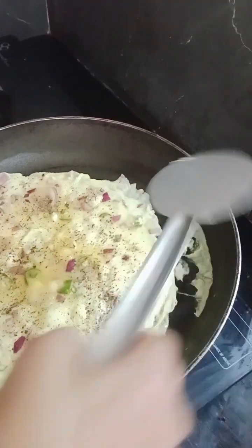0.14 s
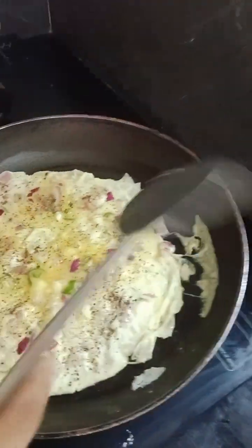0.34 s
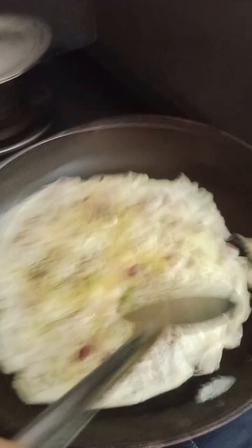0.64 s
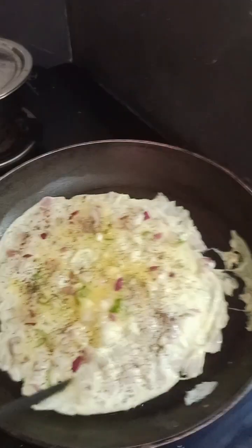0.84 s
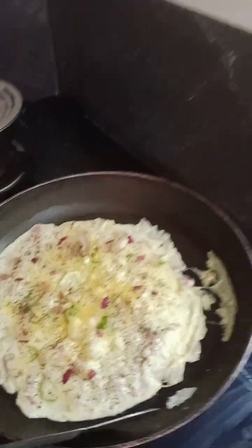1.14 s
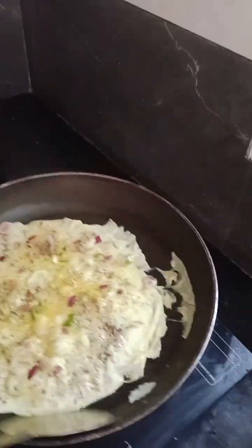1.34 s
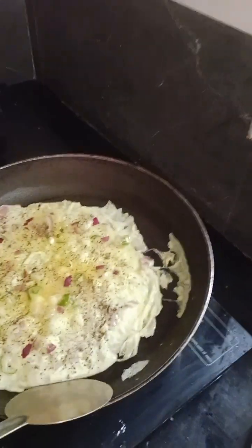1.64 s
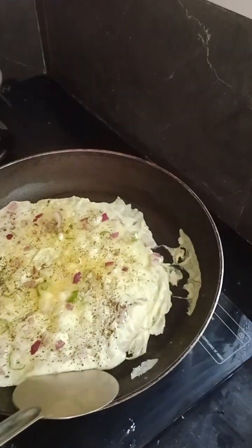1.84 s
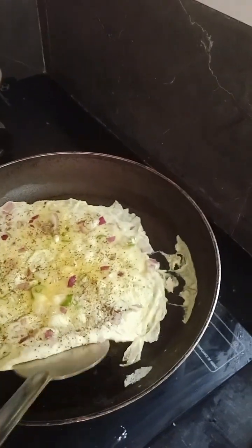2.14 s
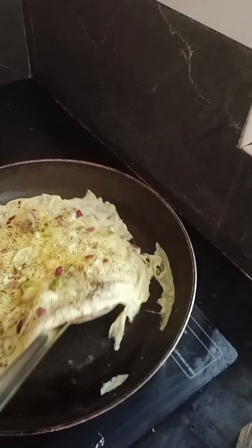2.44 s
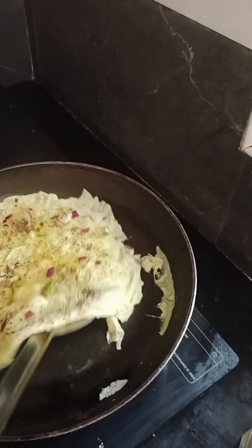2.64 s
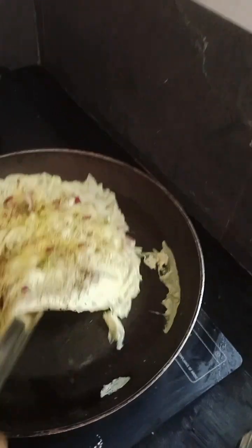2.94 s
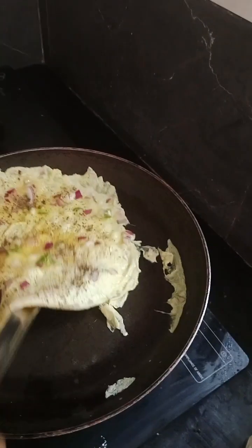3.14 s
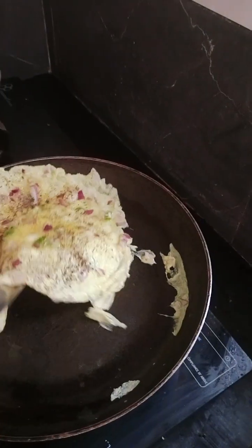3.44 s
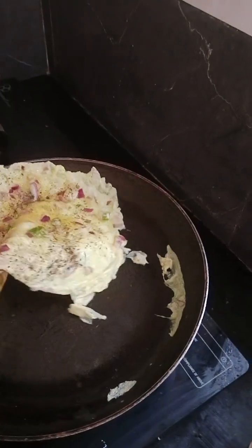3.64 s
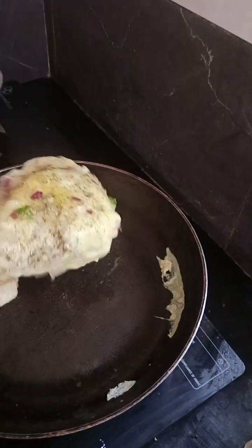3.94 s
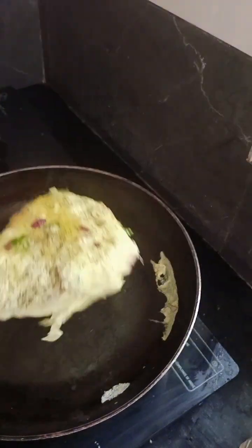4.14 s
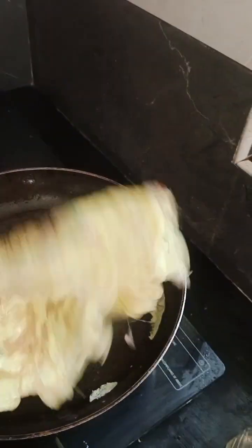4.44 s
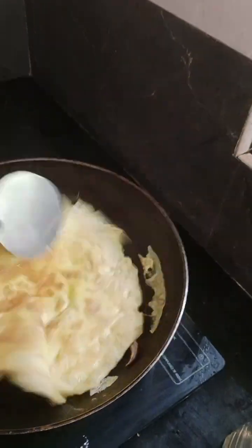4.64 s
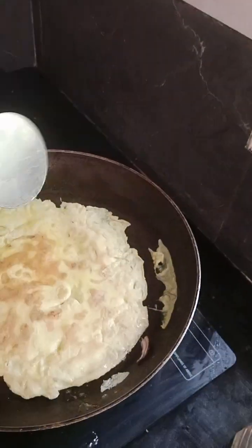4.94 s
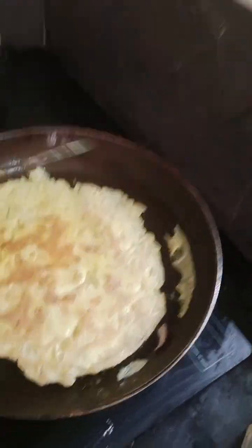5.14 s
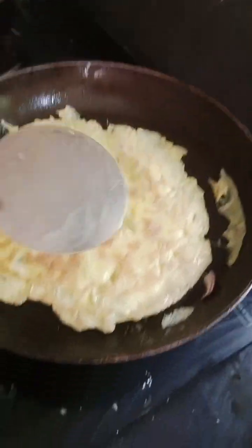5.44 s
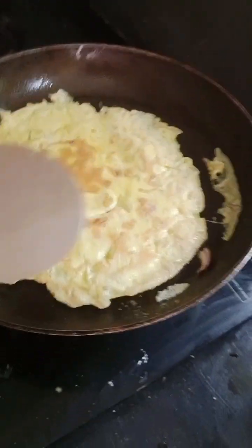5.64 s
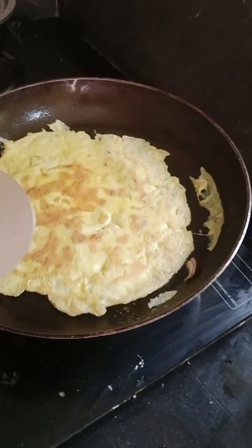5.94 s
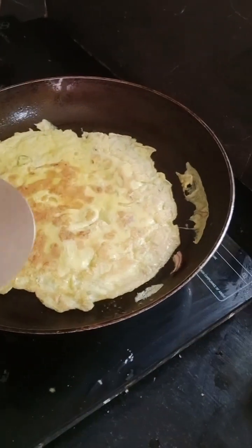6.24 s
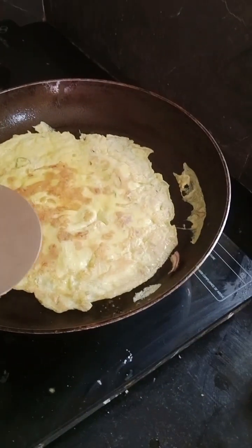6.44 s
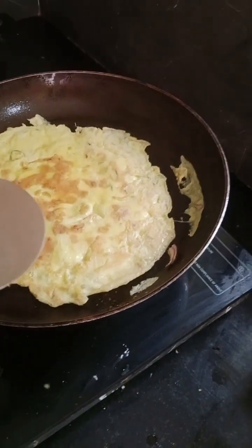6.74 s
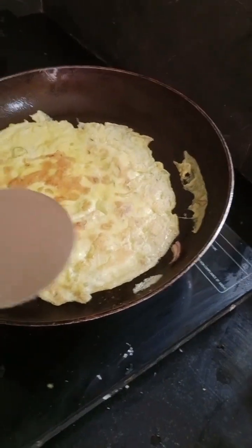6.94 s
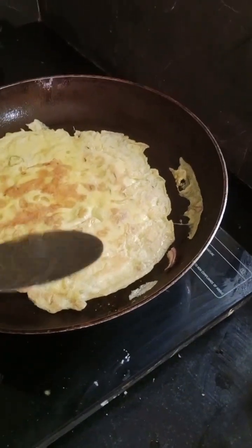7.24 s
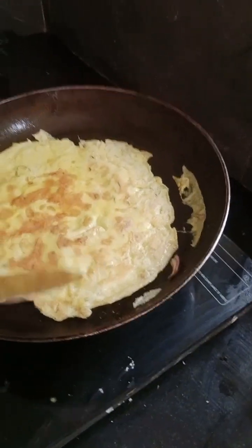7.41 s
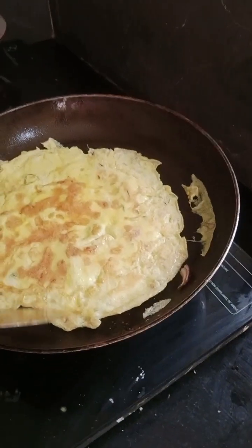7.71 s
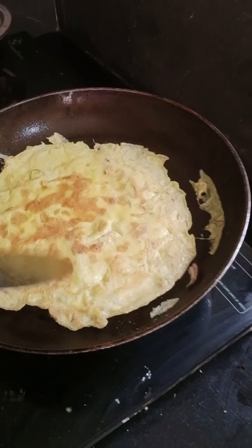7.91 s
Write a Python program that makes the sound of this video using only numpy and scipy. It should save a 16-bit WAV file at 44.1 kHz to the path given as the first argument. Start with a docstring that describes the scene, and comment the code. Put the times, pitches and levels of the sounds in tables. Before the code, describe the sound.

A metal spatula knocks and scrapes a frying pan as an omelette is lifted and flipped, crackling, then sizzling down to a faint hiss.

```python
"""Hot oil hisses and crackles around an omelette while a metal spatula knocks and scrapes the pan.
The crackle grows as the egg is lifted; the wet side lands, the sizzle flares, then settles to a fine hiss.
Filtered random clicks and short tones make the frying; damped pan modes and noise make the knocks.
Clicks sent through resonances make the scraping, and swells of narrow noise make the wet slaps and bumps.
A short room tail follows the frying, over a quiet background with a wavering low hum."""
import sys
import numpy as np
from scipy import signal
from scipy.fft import rfft, irfft
from scipy.io import wavfile
from scipy.ndimage import uniform_filter1d, map_coordinates

SR = 44100
rng = np.random.default_rng(int(sys.argv[2]) if len(sys.argv) > 2 else 0)


def dump(signal):
    """Clip the signal to [-1, 1] and save it as 16-bit WAV at the path in sys.argv[1]."""
    limited = np.clip(np.atleast_2d(signal).T, -1, 1)
    pcm = np.round(limited * 32767).astype(np.int16)
    wavfile.write(sys.argv[1], SR, pcm)


N = 355887
T = np.arange(N) / SR  # time [s]
LANDING_S = 4.77  # when the wet side lands

# colour of the fine fizz: (pitch [Hz], level [dB per Hz])
FIZZ_COLOUR = [(1000, -27), (3800, -31.5), (4800, -41.5), (6400, -36.5), (7300, -12), (8300, -9.5),
               (9300, -14.5), (10000, -3.5), (10700, 0), (11600, -5), (12700, -1.5), (13900, -8.5),
               (15700, -4), (16600, -24)]
# colour of the coarser spitting: (pitch [Hz], level [dB per Hz])
SPITTING_COLOUR = [(100, -64), (600, -30), (1600, -11.5), (2050, -1.5), (2400, -1.5), (2700, -2.5),
                   (3300, 0), (4400, -1.5), (4700, -17), (4950, -9), (5400, -3.5), (6200, -9), (7500, 2),
                   (11000, -12.5)]
# dense clatter between the ringing modes: (pitch [Hz], level [dB per Hz])
CLATTER_COLOUR = [(30, -30), (75, -27), (120, -28), (180, -19), (270, 1), (400, -4.5), (600, 4.5),
                  (1100, -5), (2000, -12.5), (3200, -12), (4900, -29), (7600, -14.5), (9300, -18.5),
                  (10800, -8), (16000, -28)]


def sizzle(fine_flutter_db=1.0, spit_flutter_db=2.33, spit_tone_share=0.59, crackle_share=0.41):
    """Fine fizz, coarser spitting and a muffled bubbling, each of random clicks, the last two with short tones."""
    # sparse crackle among the spitting: (pitch [Hz], level [dB per Hz])
    crackle_colour = [(500, -36), (1500, -16.5), (1950, -4), (3200, 1.5), (4300, 1), (4800, -21),
                      (5500, -16), (7000, -10), (12000, -19)]
    # steam bubbling under the turned omelette: (pitch [Hz], level [dB per Hz])
    steam_colour = [(80, -47), (250, -43), (470, -19.5), (600, -4), (850, -7.5), (1200, -5.5), (1700, -8),
                    (2300, -7), (4000, -34.5)]
    # frying before the flip, rising as the egg is lifted off the oil: (time [s], level [dB])
    frying = [(0, -71), (1.7, -73.5), (2.17, -64.5), (2.55, -53.5), (2.8, -51), (3.1, -48), (3.45, -51),
              (3.85, -48), (4.2, -50.5), (4.56, -50.5), (4.65, -56.5), (4.75, -54)]
    # bubbles as fresh egg touches hot metal: (time [s], length [s], fizz [dB], spit [dB])
    flurries = [(.375, 0.049, -67.5, -90), (2.12, 0.015, -64, -77), (2.242, 0.0054, -55, -67),
                (2.3, 0.044, -60, -67.5), (2.435, 0.073, -74, -63), (2.544, .006, -53, -52),
                (2.59, 0.0062, -40.5, -51), (2.86, 0.03, -46, -59), (2.995, 0.034, -46, -51),
                (3.155, 0.024, -47, -53.5), (3.275, 0.016, -47, -50.5), (3.685, 0.022, -44, -59),
                (3.97, 0.071, -57, -60), (4.345, 0.054, -52, -59)]
    # flares at the landing: (flare [dB], its fall [dB per s], simmer [dB], its fall [dB per s])
    fine_flare = (-41, 29, -57.5, 1.45)
    spit_flare = (-49, 27.5, -66.5, 5.5)
    steam_flare = (-53, 22, -75, 2.5)

    fine = colour(clicks(rate=6000, spread_db=3.7, cap=5.7), FIZZ_COLOUR)
    fine *= undb(fine_flutter_db * walk(70))

    coarse = colour(clicks(rate=3000, spread_db=3.2), SPITTING_COLOUR)
    coarse *= undb(spit_flutter_db * walk(35))
    coarse += crackle_share * colour(clicks(rate=170, spread_db=4.5, cap=2.6), crackle_colour)
    coarse += spit_tone_share * short_tones(SPITTING_COLOUR, 1500, 4500, count=3200, life_s=0.006)

    muffled = colour(clicks(rate=1200, spread_db=3.0), steam_colour)
    muffled += 0.9 * short_tones(steam_colour, 500, 2000, count=1100, life_s=0.011)

    # after the landing this first frying falls by 60 dB per second
    frying_db = np.interp(T, *np.transpose(frying)) - 60 * np.maximum(T - LANDING_S, 0)
    # spitting is at -58.5 dB when the frying is at -49.5 dB, and changes 1.52 times as fast
    spit_db = -58.5 + 1.52 * (frying_db + 49.5)
    fine_flurry, spit_flurry = envelope(flurries, attack_s=0.014, release_s=0.0067)

    # gains join as powers
    fine_gain = np.linalg.norm([undb(frying_db), fine_flurry, flare(*fine_flare)], axis=0)
    spit_gain = np.linalg.norm([undb(spit_db), spit_flurry, flare(*spit_flare)], axis=0)
    return fine * fine_gain + patchy(coarse) * spit_gain + patchy(unit(muffled)) * flare(*steam_flare)


def flare(flare_db, fall_db_per_s, simmer_db, simmer_fall_db_per_s, rise_s=0.055):
    """Gain of the bubbling after the landing: surface water boils off fast, the rest slowly."""
    age = np.maximum(T - LANDING_S - rise_s, 0)
    contact = np.clip((T - LANDING_S) / rise_s, 0, 1)
    burst = undb(flare_db - fall_db_per_s * age)
    simmer = undb(simmer_db - simmer_fall_db_per_s * age)
    return contact * np.hypot(burst, simmer)


def short_tones(points, low_hz, high_hz, count, life_s):
    """Short tones at random times and pitches, each swelling and fading; rms 1."""
    out, t = np.zeros(N), T[:SR // 16]
    for when, pitch, strength, life in rng.random((count, 4)):
        hz = low_hz + pitch * (high_hz - low_hz)
        age = t / (life_s * (0.5 + life))
        gain = undb(spectrum_db(points, hz) + 6 * strength)
        add(out, when * T[-1], gain * age * np.exp(-age) * np.sin(2 * np.pi * hz * t))
    return unit(out)


def patchy(x, depth_db=2.9, width_hz=200, rate_hz=14):
    """Random gains over pitch and time make the noise swell and fade in patches; rms 1."""
    hz, s, z = signal.stft(x, SR, nperseg=512)
    # a random map over pitch and time, read between its grid points
    places = np.meshgrid(hz / width_hz, s * rate_hz, indexing="ij")
    field = map_coordinates(noise(size=(128, 256)), places)
    return unit(signal.istft(z * undb(depth_db * field), SR)[1][:N])


def pops(spray=0.36, spray_s=0.00058):
    """Single larger bubbles snap and leave a brief spray; the wetter ones have more body."""
    # sharp pops of oil: (time [s], peak level [dB], body before a shared 5 dB cut [dB])
    pop_rows = [(0.2127, -55, -27), (0.336, -48.5, -24), (.578, -46, -12), (0.615, -39, -21),
                (0.726, -40, -14), (0.996, -42, -22), (1.067, -47, -28), (1.387, -50.5, -38),
                (2.114, -44, -11), (2.2411, -42, -14), (2.256, -38, -15), (2.297, -34.5, -24),
                (2.3452, -29, -9), (2.384, -31.5, 3), (2.4056, -30.5, 8), (2.45, -28.5, 5),
                (2.518, -36, -13), (2.543, -23, 1), (2.548, -27, 3), (2.595, -35, -12), (2.6304, -26, -7),
                (2.638, -34, -2), (2.689, -33, 8), (2.807, -33, 13), (2.828, -32.5, 7.5), (2.87, -27, -4),
                (2.882, -35, -11), (2.987, -27, -1), (3.013, -33, 0), (3.07, -30, -15), (3.081, -24.5, -6),
                (3.121, -25.5, 12), (3.151, -21.5, 1), (3.285, -33, 6), (3.338, -39, 10), (3.532, -38, 5),
                (3.6706, -33, 11), (3.688, -30, -3), (3.809, -24, -30), (3.997, -28, -22), (4.004, -32, 0),
                (4.11, -30, -22), (4.133, -45, 7), (4.199, -29, -14), (4.362, -33.5, 12), (4.436, -34.5, 8),
                (4.571, -39, -3), (4.878, -23, -9), (4.994, -22.5, -25), (5.0403, -22, -20),
                (5.86, -43, -28), (6.563, -40, -30), (6.608, -35, -27), (7.469, -39, -34),
                (7.556, -44, -32)]
    out, t = np.zeros(N), T[:1024]
    for s, db, body_db in pop_rows:
        burst = spray * noise(size=len(t)) * np.exp(-t / spray_s)
        burst[0] = 1  # the snap itself
        body = undb(body_db - 5) * colour(burst, SPITTING_COLOUR)
        snap = colour(burst, FIZZ_COLOUR) + body
        add(out, s, undb(db) * snap / np.abs(snap).max())
    return out


def scrape():
    """The spatula sticks and slips; its edge, flat side and tip ring differently, and the pan rocks."""
    # resonances of the dragging edge: (pitch [Hz], width [Hz], level [dB])
    edge_modes = [(891.7, 29, 8), (955, 76, 0.5), (853, 24, 4.5), (1041, 24, -1), (1093, 56, -12),
                  (1182, 9.4, 0)]
    # the same columns for the flat blade, the rasping tip and the squeaking thin edge
    blade_modes = [(502, 50, 2), (559.5, 22, 2.5), (595, 24, 1), (777, 47, 2.5)]
    rasp_modes = [(1353, 85, -2.5), (1438, 67, -2), (1610, 126, 0.5), (1819.5, 38, 6.5), (1879, 34, 2),
                  (3340, 280, -10)]
    squeak_modes = [(1323, 49, -8), (1392, 78, -4.5)]
    # pushes over the pan: (time [s], length [s], edge drag [dB], flat blade rub [dB], tip rasp [dB],
    # squeak [dB], edge pitch [times])
    strokes = np.array([(1.503, 0.054, -69, -72, -100, -97, 1.01), (1.995, 0.039, -76, -83, -80, -83, 1.05),
                        (2.117, 0.06, -62.5, -90, -72, -65, 1.005),
                        (2.226, 0.082, -60, -84, -80, -77, 0.98),
                        (2.349, 0.043, -51.5, -86, -62, -67, 1.007),
                        (2.431, 0.09, -48.5, -68, -56.5, -71, 0.99),
                        (2.545, 0.045, -53, -67, -60.5, -65, 0.96),
                        (2.616, 0.109, -64, -84, -64.5, -75, 1.024),
                        (2.762, 0.11, -52, -73.5, -65, -72, 1.05),
                        (2.975, 0.085, -44, -66.5, -53.5, -66, 0.99),
                        (3.07, 0.088, -50, -56, -58, -66, 1.054),
                        (3.274, 0.076, -50, -70.5, -61, -77, 0.99),
                        (3.403, 0.054, -48, -60.5, -63, -70, 0.98),
                        (3.475, 0.079, -49.5, -53.5, -50.5, -73, 1.02),
                        (3.579, 0.026, -56, -57.5, -54, -75, 1.05),
                        (3.667, 0.11, -64.5, -64.5, -66.5, -75, 0.98),
                        (3.832, 0.14, -59, -71.5, -77, -67, 0.96), (4.024, 0.025, -66, -89, -85, -79, .94),
                        (4.09, 0.026, -70, -91, -85, -73, 0.93)])
    # the pan rocks on its stand as the blade wedges under the egg: (time [s], length [s], level [dB])
    rocking_rows = [(2.45, 0.024, -60), (2.565, 0.049, -67)]

    slips = clicks(rate=2000, spread_db=1.5) * undb(1.2 * walk(55))
    # the resonances shift as the point of contact travels
    middle_s = strokes[:, 0] + strokes[:, 1] / 2
    edge_pitch = np.interp(T, middle_s, strokes[:, -1])
    parts = [
        waver(sustain(resonances(slips, edge_modes)), 0.008, edge_pitch),
        waver(resonances(slips, blade_modes), 0.02),
        waver(resonances(slips, rasp_modes), 0.005),
        waver(resonances(slips, squeak_modes), 0.012),
    ]
    pushes = envelope(strokes[:, :-1], attack_s=0.023, release_s=0.023)
    rocking = unit(resonate(slips, hz=168, width=34))
    rocking *= envelope(rocking_rows, attack_s=0.01, release_s=0.025)[0]
    return np.sum(pushes * parts, axis=0) + rocking


def resonances(x, modes):
    """One push shakes several resonances at once, and their sounds add up; rms 1."""
    return unit(sum(undb(db) * resonate(x, hz, width) for hz, width, db in modes))


def sustain(x, share=0.63, size=900):
    """Stick and slip feed a ringing edge as fast as it loses energy, evening out its strength; rms 1."""
    power = np.abs(uniform_filter1d(x ** 2, size)) + 1e-9
    return unit(x / power ** (np.clip(share, 0, 1) / 2))


def waver(x, share, pitch=1, rate=6):
    """Reading a sound faster or slower scales every pitch in it, here with a small random wander."""
    return np.interp(np.cumsum(pitch + share * walk(rate)) / SR, T, x)


def knocks(bass_hz=430, treble_hz=2200, overtone_t60=0.26, roughness_db=3, count=48):
    """Each blow rings the pan's main modes and many weak overtones over a short clatter."""
    # blows and their bounces: (time [s], level [dB], bass [dB], treble [dB], ring length [times],
    # spot [0 wall to 1 floor])
    knock_rows = [(1.091, -4.5, 17.5, 4, 1, 0.084), (1.105, -8.5, 16.5, 2, 0.91, 0),
                  (1.198, -16, 13, -3.5, 0.76, 0.0011), (1.684, -17, -24, -33, 1, 0.71),
                  (1.7052, -7.5, -15, 11, 0.99, 1), (1.722, -4, -22, -21, 0.99, 1),
                  (1.748, -1, 5.5, -2.5, 0.96, 1), (1.777, -1, 0, -7, 1, 0.76),
                  (1.838, -12, 10, -5, 0.94, 0.86), (1.905, -19.5, 0, -4.5, 0.54, 1),
                  (2.43, -16, -30, 2, 0.25, 1), (3.08, -7.5, -26, -16, 0.47, 0.69),
                  (3.147, -7, -30, -1, 0.27, 0.8)]
    # modes of the pan on its stand and of the spatula: (pitch [Hz], level when struck on the wall [dB],
    # level when struck on the floor [dB], time to fall 60 dB at ring length 1 [s])
    pan_modes = [(164, -4.5, -16, 0.36), (205.9, -4, -7, 0.37), (353, -1.5, -4.5, 0.32),
                 (371, -4, -1, 0.36), (413, -3.5, -2, 0.33), (428.3, -1, -2, 0.2), (575, -16, 3.5, 0.15),
                 (623, -6, 2.5, 0.27), (785, -9, -11, 0.23), (865, -4, 2, 0.32), (949, -11.5, -3.5, 0.32),
                 (1137, 0, -7, 0.31), (1185, -2.5, -8, 0.3), (1354, -18, -17.5, 0.42),
                 (1480, -9, -10, 0.29), (1577, -10, -13, 0.22), (1720, -9.5, -16, 0.27),
                 (1830, -16, -15, 0.38), (2073, -6, -9.5, 0.34), (2330, -8, -13, 0.23),
                 (2517, -18, -1, 0.3), (2830, -20, -21, 0.15), (3060, -0.5, -15, 0.15),
                 (3176, -3, -5.5, 0.29), (3740, -12, -13, 0.23), (4140, -20, -20, 0.16),
                 (4280, -4, -13, 0.13), (5030, -18, -36, 0.29), (5530, -25, -32, 0.19),
                 (6200, -28, -34, 0.26), (6670, -16, -26, 0.32), (6600, -15, -22, 0.4),
                 (8000, -17, -21, 0.5), (11100, -14, -12, 0.25), (12600, -9, -3, .15)]

    out = np.zeros(N)
    hz, wall_db, floor_db, t60 = np.transpose(pan_modes)
    overtone_hz = 1200 + 14500 * ((np.arange(count) + rng.random(count)) / count) ** 1.2
    overtone_db = spectrum_db(CLATTER_COLOUR, overtone_hz) + 2 * noise(size=count)
    for s, level_db, bass_db, treble_db, share, spot in knock_rows:
        t = T[:int(SR * 0.4 * min(share, 1.1))]
        db = wall_db + np.clip(spot, 0, 1) * (floor_db - wall_db)
        blow = undb(-48) * ring(hz, db, t60 * share, t)
        blow += undb(-50) * ring(overtone_hz, overtone_db, np.full(count, overtone_t60 * share), t)
        # a random wander makes the clatter die away unevenly
        clatter = colour(noise(size=len(t)), CLATTER_COLOUR) * undb(roughness_db * walk(90)[:len(t)])
        blow = blow + undb(-49.5) * clatter * np.exp(-np.log(1000) * t / (0.27 * share))
        # metal meets metal with a short bright crack
        blow += undb(-41) * (clatter - lowpass(clatter, treble_hz)) * np.exp(-t / 0.018)

        # split into bass, middle and treble to set the tone of each blow
        bass, body = lowpass(blow, bass_hz), lowpass(blow, treble_hz)
        middle, treble = body - bass, blow - body
        # the heavy low modes take a moment to build up
        bass_swell = undb(bass_db) * (1 - np.exp(-t / 0.056))
        add(out, s, undb(level_db) * (bass * bass_swell + middle + undb(treble_db) * treble))
    return out


def ring(hz, db, t60, t, wander_rate=70):
    """Damped modes whose strength and phase wander at random as they die away."""
    out, t = np.zeros(len(t), np.float32), t.astype(np.float32)
    knots = np.arange(64)
    for mode_hz, mode_db, mode_t60 in zip(hz.tolist(), db.tolist(), t60.tolist()):
        # each mode gets a slightly random level and a random phase
        start = undb(mode_db + rng.standard_normal()) * np.exp(2j * np.pi * rng.random())
        wander = 1 + 0.55 * (noise(size=len(knots)) + 1j * noise(size=len(knots)))
        strength = np.interp(t * wander_rate, knots, start * wander).astype(np.complex64)
        angle = 2 * np.pi * mode_hz * t
        wave = strength.real * np.sin(angle) + strength.imag * np.cos(angle)
        out += wave * np.exp(float(-np.log(1000) / mode_t60) * t)
    return out


def taps(split_hz=1400, crack_db=-6, crack_s=0.0062):
    """The hand-damped handle cracks and rings; a sharp touch favours its high modes, a soft one its low ones."""
    # a light tap as the grip changes, then a duller bump:
    # (time [s], level [dB], low modes [dB], high modes [dB])
    tap_rows = [(0.726, -57, -22, 1.5), (0.731, -59, 0, -18)]
    # modes of the tapped handle: (pitch [Hz], level [dB], time to fall 60 dB [s])
    handle_modes = [(128, -4, 0.12), (600, 3.5, 0.029), (770, -5, 0.03), (1060, -7, 0.061),
                    (1330, -9.5, 0.097), (1640, -9, 0.072), (2020, 3.5, 0.036), (2400, -25, .07),
                    (2820, -13.5, 0.11), (3400, -17, .04), (3800, -18, 0.051), (5450, -6, .025),
                    (6060, -24, .08), (6650, -20, .04)]
    out, t = np.zeros(N), T[:SR // 8]
    hz, db, t60 = np.transpose(handle_modes)
    for s, level_db, bass_db, treble_db in tap_rows:
        crack = colour(noise(size=len(t)), CLATTER_COLOUR) * np.exp(-t / crack_s)
        tone_db = np.where(hz < split_hz, bass_db, treble_db)
        ringing = ring(hz, db + level_db + tone_db, t60, t)
        add(out, s, ringing + undb(level_db + crack_db) * crack)
    return out


def slaps():
    """Wet slaps and air pockets, as the egg peels off and lands, puff through narrow resonances."""
    # (time [s], level [dB], pitch [Hz], width [Hz], rise [s], decay [s])
    slap_rows = [(3.67, -41.5, 2080, 450, 0.00075, 0.004), (4.437, -59, 1900, 349, 0.00087, 0.0051),
                 (4.715, -66, 1290, 90, 0.0055, 0.042), (4.751, -46, 1290, 90, 0.0055, 0.012),
                 (4.753, -50.5, 1730, 1010, 0.0051, 0.027), (4.768, -50.5, 1070, 200, 0.017, .024),
                 (4.792, -42.5, 1510, 1510, 0.0097, 0.017), (4.798, -42.5, 925, 450, 0.0038, 0.046),
                 (4.812, -47, 600, 300, 0.0058, 0.041), (4.812, -54, 159, 70, .0023, 0.063),
                 (4.815, -67, 71, 40, .008, 0.1), (4.93, -64.5, 150, 80, 0.0088, 0.064),
                 (5.29, -66, 720, 200, 0.03, 0.09)]
    return puffs(slap_rows)


def bumps():
    """Soft low bumps, each a swell of noise around one low pitch."""
    # (time [s], level [dB], pitch [Hz], width [Hz], rise [s], decay [s])
    bump_rows = [(.8, -77, 159, 40, 0.034, 0.057), (3.078, -54.5, 390, 201, 0.005, 0.025),
                 (3.11, -61, 312, 70, 0.02, 0.031), (5.78, -72, 157, 60, 0.018, 0.034),
                 (6.29, -75.5, 220, 60, 0.028, 0.033), (6.44, -76.5, 238, 60, 0.018, 0.035),
                 (7.48, -73.5, 160, 40, 0.021, 0.049)]
    return puffs(bump_rows)


def puffs(rows):
    """Short swells of random noise, like turbulent air, in one resonance each."""
    out, t = np.zeros(N), T[:SR * 3 // 4]
    for s, db, hz, width, rise_s, decay_s in rows:
        swell = np.minimum(t / rise_s, 1) * np.exp(-np.maximum(t - rise_s, 0) / decay_s)
        add(out, s, undb(db) * swell * unit(resonate(noise(size=len(t)), hz, width)))
    return out


def kitchen(x, t60=0.27):
    """Close stone walls add a short, dense tail."""
    t = T[:SR // 2]
    tail = noise(size=len(t)) * np.exp(-np.log(1000) * t / t60) * (t > 0.002)
    return x + undb(-11) * signal.fftconvolve(x, tail / np.linalg.norm(tail))[:N]


def background():
    """Soft filtered noise, slowly wavering, with a low hum of narrow noise that comes and goes."""
    # colour of the kitchen's quiet background: (pitch [Hz], level [dB per Hz])
    kitchen_colour = [(25, -8.5), (60, -2), (100, 3.5), (170, -6), (260, 5), (500, 0), (850, -1.5),
                      (1400, -4), (2500, -14), (4000, -53), (5000, -47), (16000, -18)]
    hush = undb(-84) * colour(noise(), kitchen_colour) * undb(walk(0.64))
    hum = undb(-91) * unit(resonate(noise(), hz=169.6, width=45)) * undb(1.8 * walk(5.3))
    return hush + hum


def undb(db):
    """Decibels to gain."""
    return 10 ** (np.asarray(db) / 20)


def unit(x):
    """Scale to rms 1."""
    return x / np.sqrt(np.mean(x ** 2) + 1e-30)


def noise(size=N):
    """White noise."""
    return rng.standard_normal(size)


def add(out, s, x):
    """Mix x into out from time s on."""
    i = max(int(s * SR), 0)
    out[i:i + len(x)] += x[:max(N - i, 0)]


def walk(rate):
    """Random wander with a spread near 1, in straight lines between 'rate' new values a second."""
    return 1.2 * np.interp(T * rate, np.arange(8192), noise(size=8192))


def clicks(rate, spread_db, cap=4.5):
    """Random clicks, 'rate' a second on average, many small and a few large; rms 1."""
    size = undb(spread_db * np.minimum(rng.exponential(size=N), cap))
    return unit((rng.random(N) < rate / SR) * size * np.sign(noise()))


def spectrum_db(points, hz):
    """Read a list of (pitch [Hz], level [dB]) points at the given pitches."""
    at, db = np.transpose(points)
    return np.interp(np.log(hz), np.log(at), db)


def colour(x, points):
    """Filter through (pitch [Hz], level [dB]) points, never ahead of time; keeps the power of white noise."""
    size = 4096
    f = np.maximum(np.fft.rfftfreq(size, 1 / SR), 1)
    # folding the cepstrum forward makes the filter answer as early as possible
    cepstrum = irfft(np.log(undb(spectrum_db(points, f))))
    cepstrum[1:size // 2] *= 2
    cepstrum[size // 2 + 1:] = 0
    response = irfft(np.exp(rfft(cepstrum)))
    return signal.fftconvolve(x, response / np.linalg.norm(response))[:len(x)]


def resonate(x, hz, width):
    """A steep resonance: two band-passes in a row, each 1.5 times as wide as the pair should be."""
    b, a = signal.iirpeak(hz, hz / (1.5 * width), fs=SR)
    return signal.lfilter(b, a, signal.lfilter(b, a, x))


def lowpass(x, hz):
    """Gentle low-pass without delay."""
    return signal.filtfilt(*signal.butter(1, hz, fs=SR), x, padtype=None)


def envelope(rows, attack_s, release_s):
    """Gains of (time, length, dB, ..) events that swell up to their time, hold and fade; one per dB column."""
    power = np.zeros((len(rows[0]) - 2, N))
    lead_s = 0.2  # room for the swell ahead of each event
    t = T[:SR * 3 // 4] - lead_s
    for s, length_s, *levels in rows:
        shape = np.exp(np.minimum(t, 0) / attack_s - np.maximum(t - length_s, 0) / release_s)
        for layer, db in zip(power, levels):
            add(layer, s - lead_s, (undb(db) * shape) ** 2)
    return np.sqrt(power)


def scene():
    """Frying with its room tail, then spatula, slaps and bumps without it, over the quiet background."""
    frying = kitchen(sizzle() + pops())
    spatula = scrape() + knocks() + taps()
    return (frying + spatula + slaps() + bumps() + background())[None]


def record(dry):
    """The phone drops the deepest bass and cuts the top steeply."""
    dry = signal.sosfilt(signal.butter(2, 50, "high", fs=SR, output="sos"), dry)
    top_cut = signal.firwin(401, 15900, fs=SR)  # top edge [Hz]
    return signal.fftconvolve(dry, top_cut[None], mode="same", axes=1)


dry = scene()
out = record(dry)
dump(out)
```